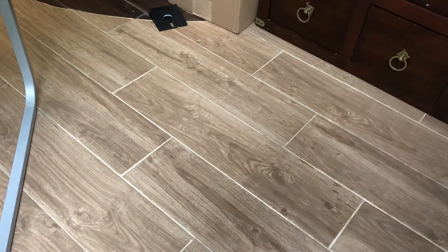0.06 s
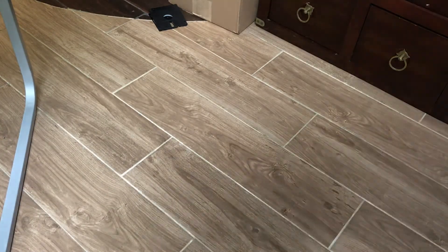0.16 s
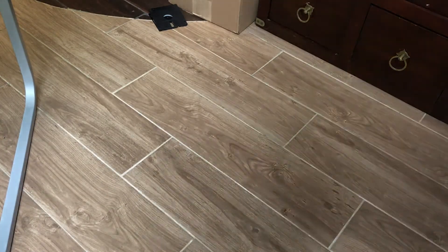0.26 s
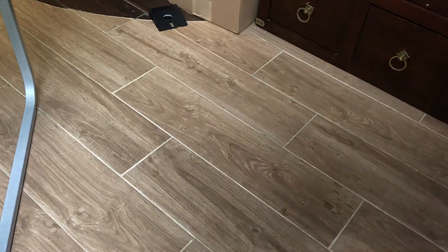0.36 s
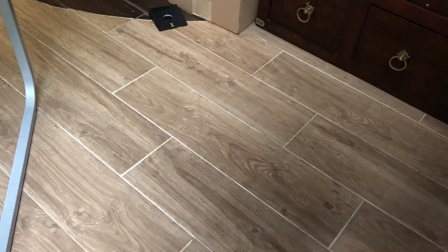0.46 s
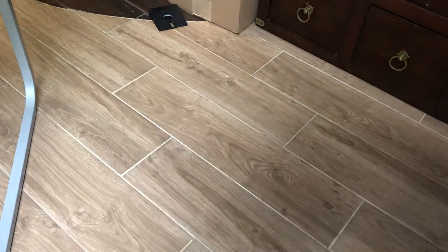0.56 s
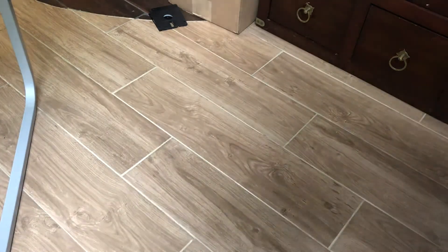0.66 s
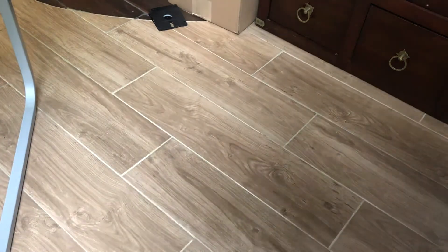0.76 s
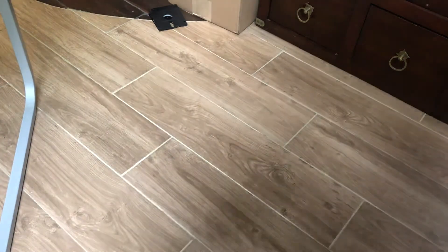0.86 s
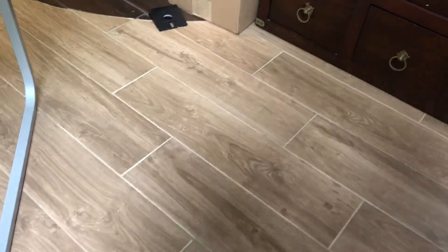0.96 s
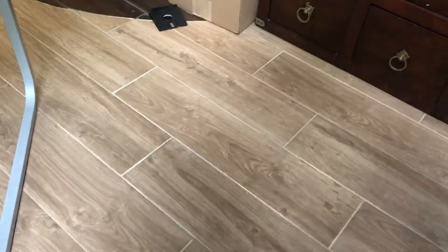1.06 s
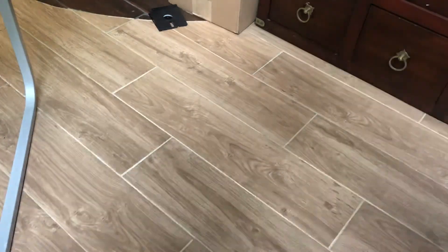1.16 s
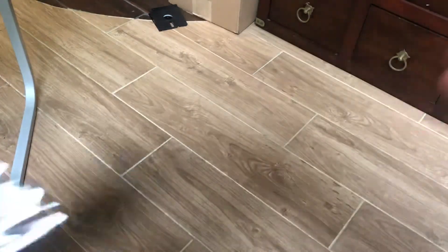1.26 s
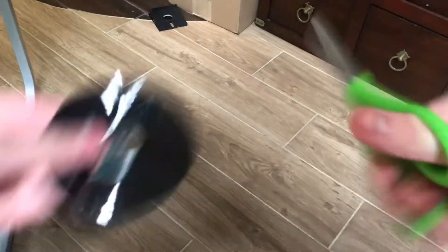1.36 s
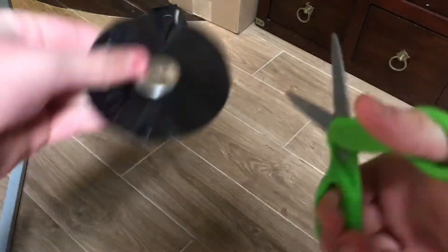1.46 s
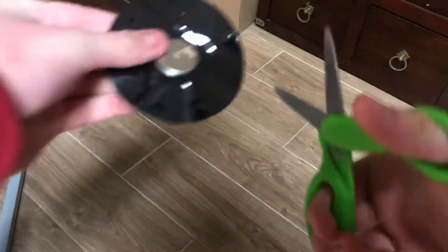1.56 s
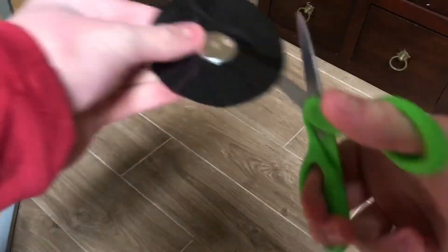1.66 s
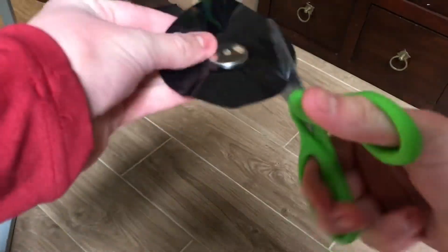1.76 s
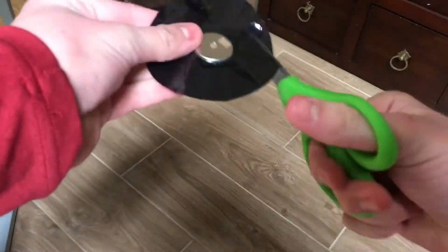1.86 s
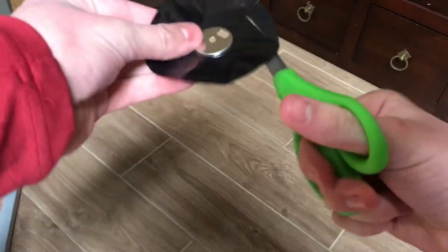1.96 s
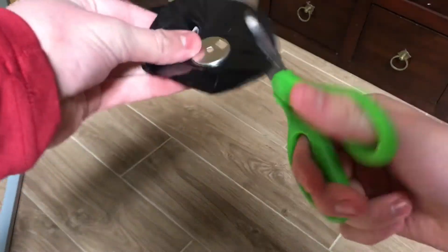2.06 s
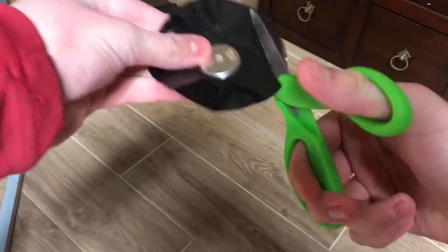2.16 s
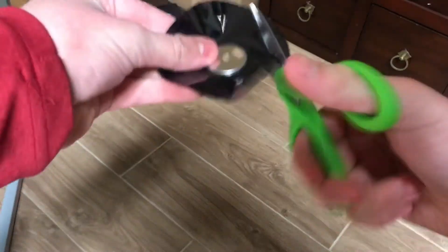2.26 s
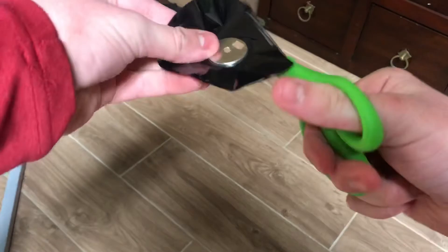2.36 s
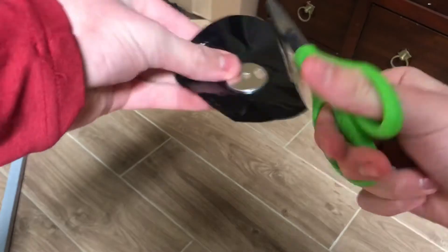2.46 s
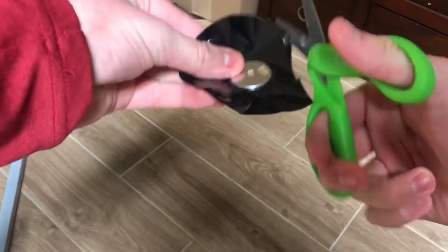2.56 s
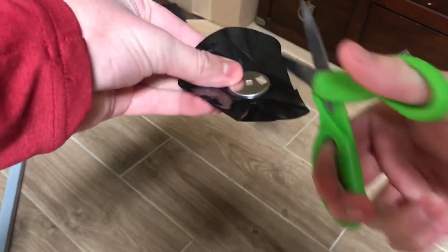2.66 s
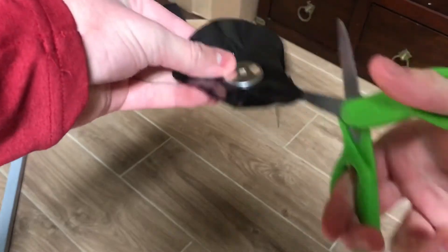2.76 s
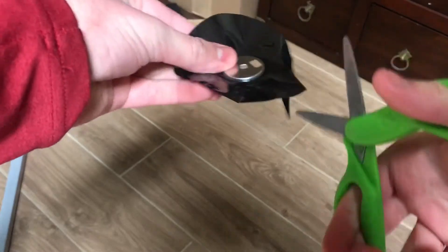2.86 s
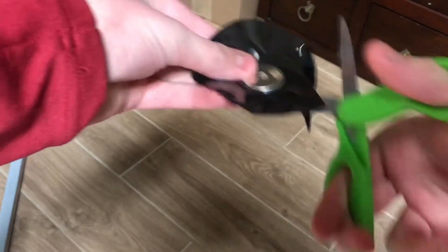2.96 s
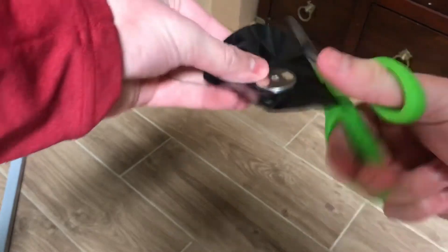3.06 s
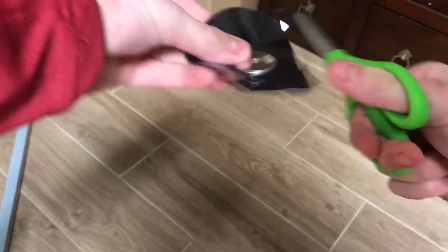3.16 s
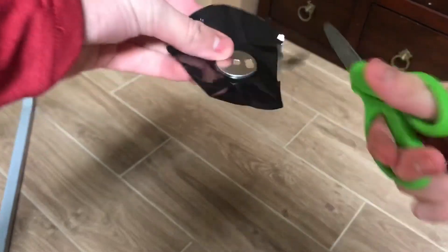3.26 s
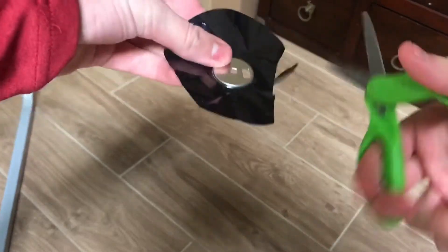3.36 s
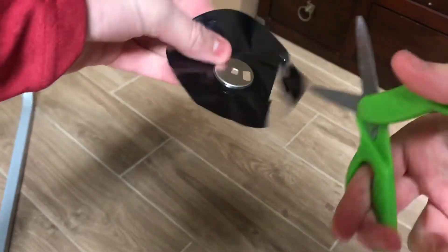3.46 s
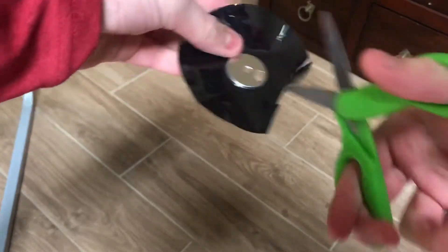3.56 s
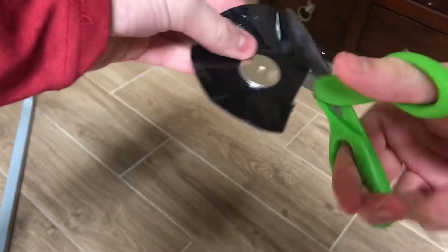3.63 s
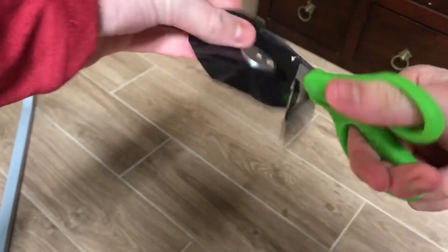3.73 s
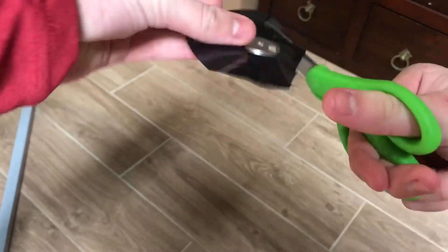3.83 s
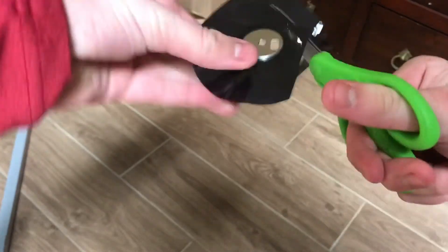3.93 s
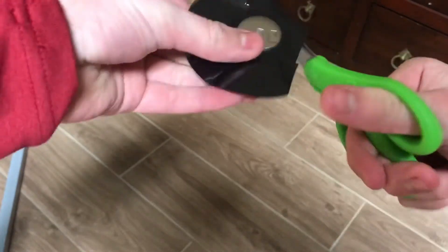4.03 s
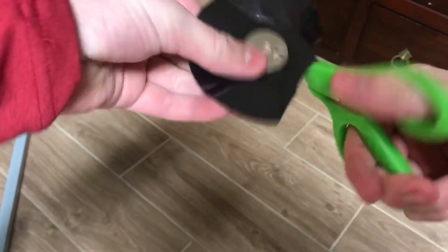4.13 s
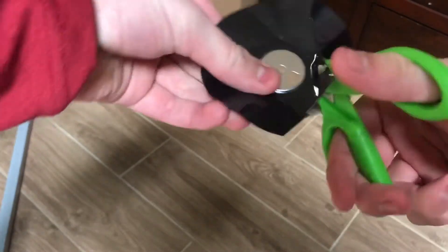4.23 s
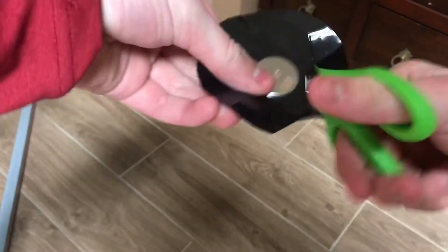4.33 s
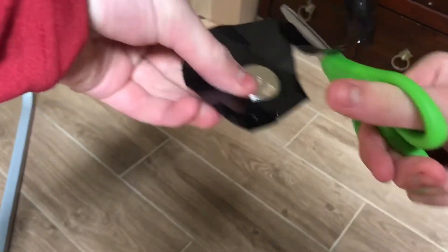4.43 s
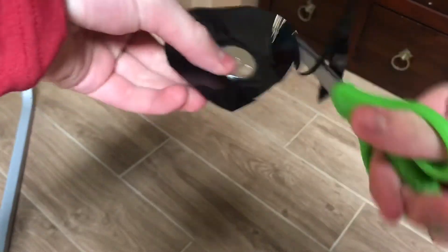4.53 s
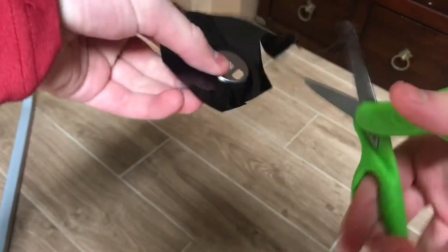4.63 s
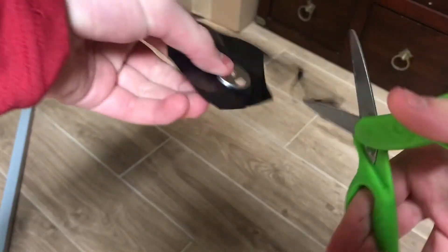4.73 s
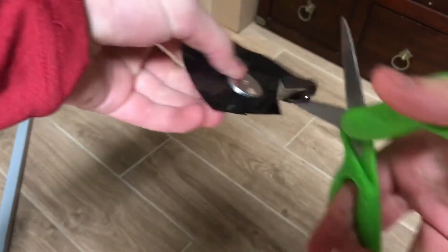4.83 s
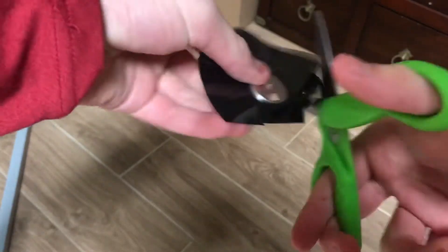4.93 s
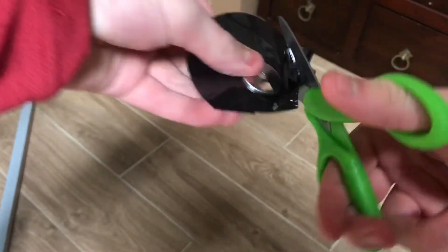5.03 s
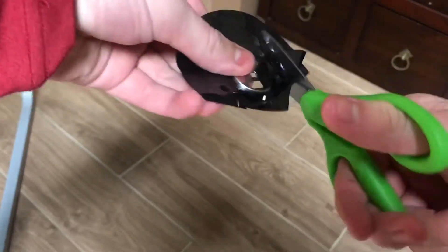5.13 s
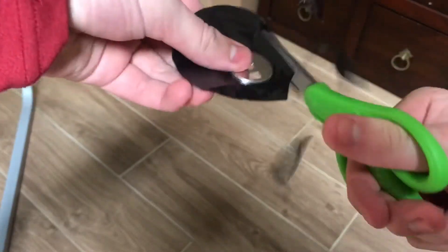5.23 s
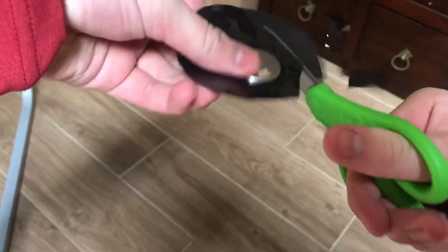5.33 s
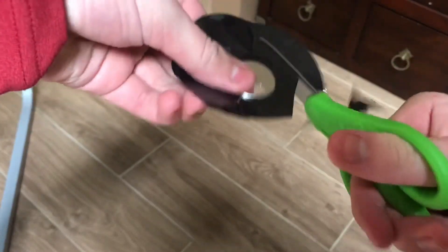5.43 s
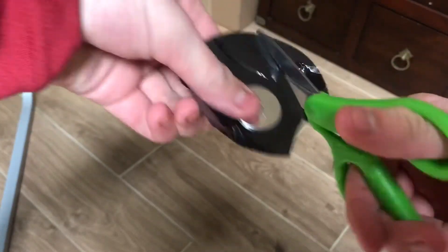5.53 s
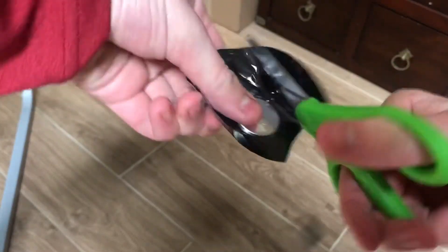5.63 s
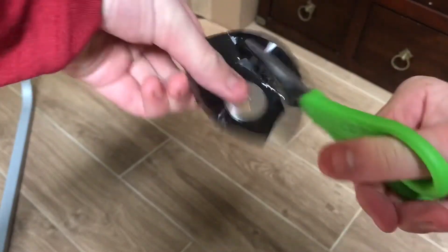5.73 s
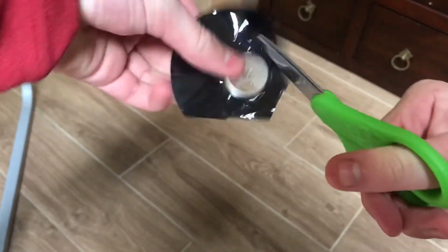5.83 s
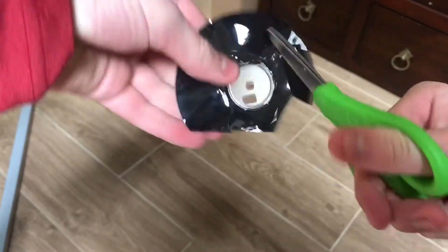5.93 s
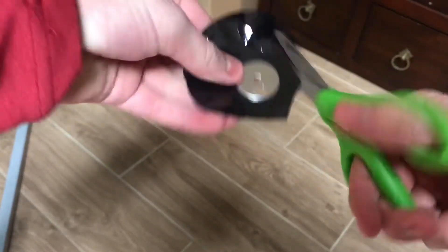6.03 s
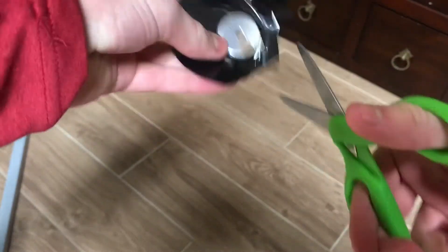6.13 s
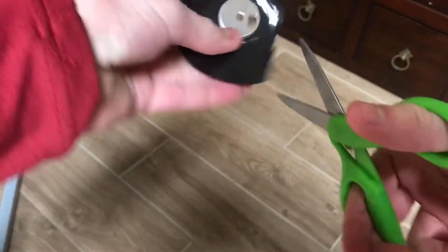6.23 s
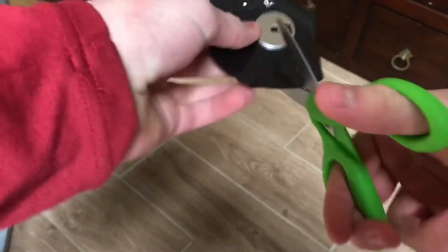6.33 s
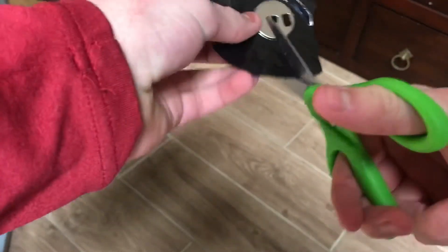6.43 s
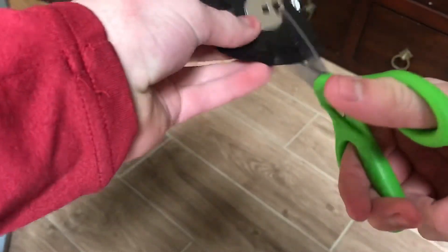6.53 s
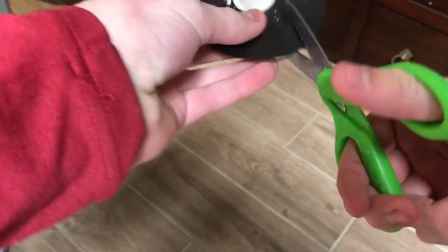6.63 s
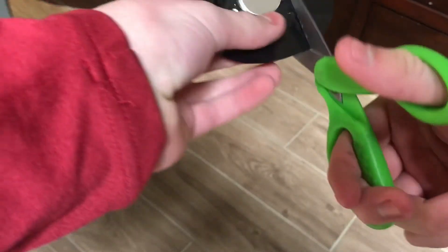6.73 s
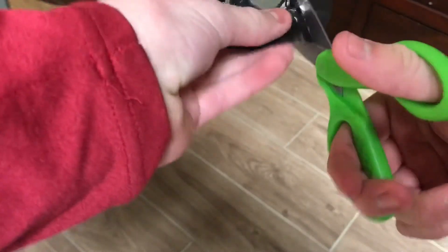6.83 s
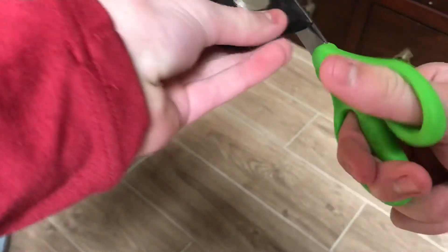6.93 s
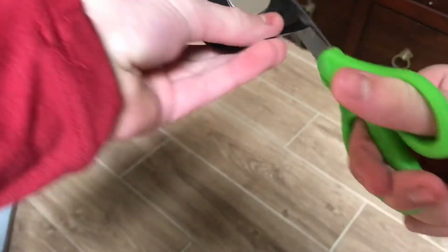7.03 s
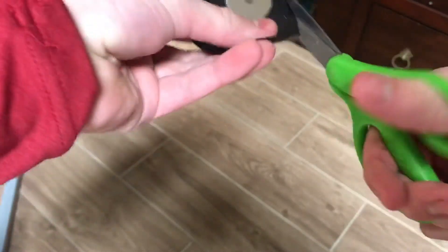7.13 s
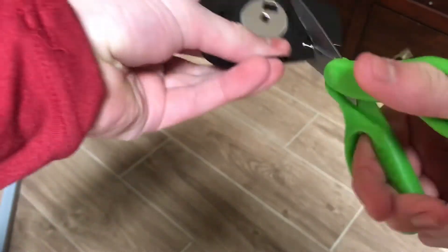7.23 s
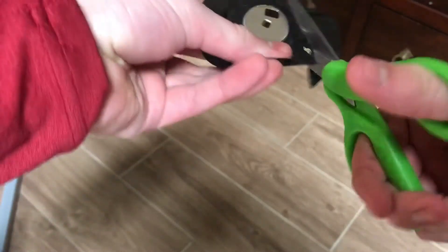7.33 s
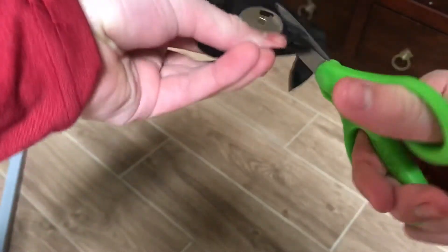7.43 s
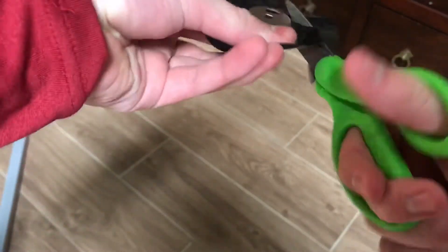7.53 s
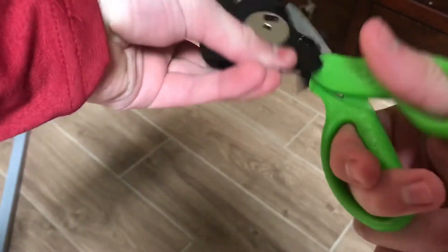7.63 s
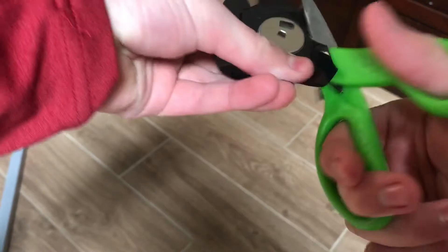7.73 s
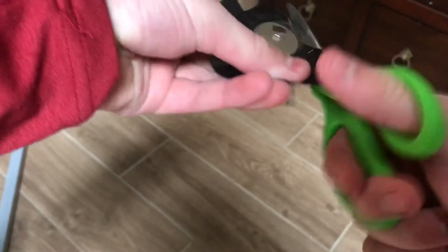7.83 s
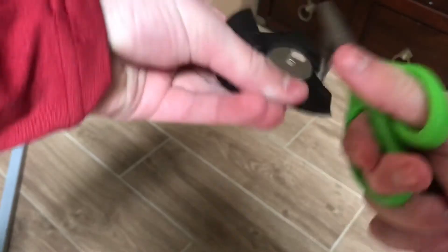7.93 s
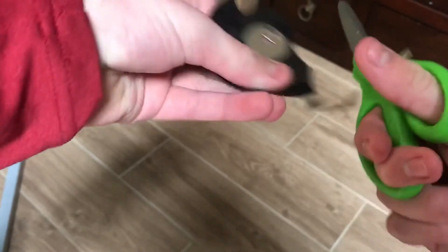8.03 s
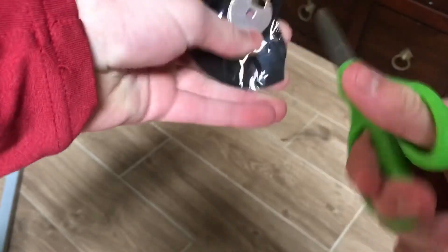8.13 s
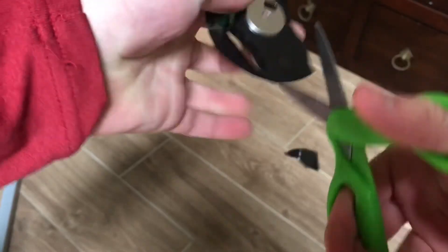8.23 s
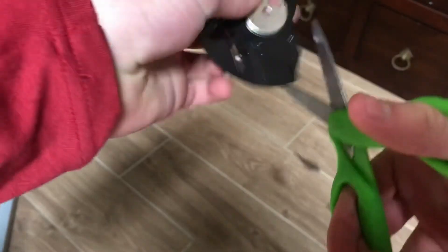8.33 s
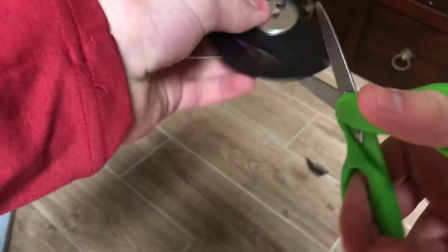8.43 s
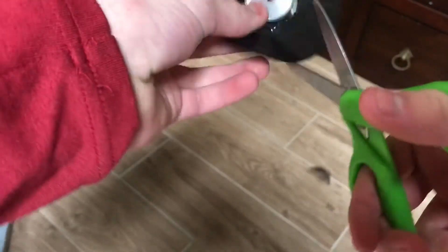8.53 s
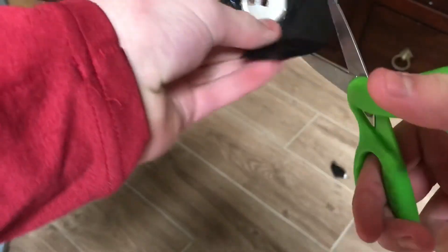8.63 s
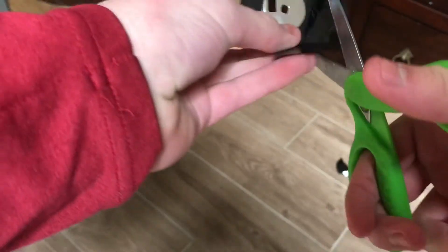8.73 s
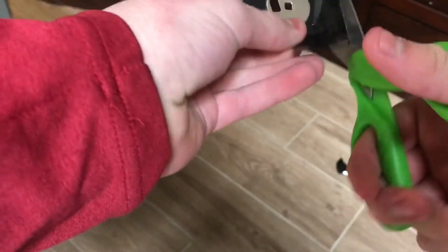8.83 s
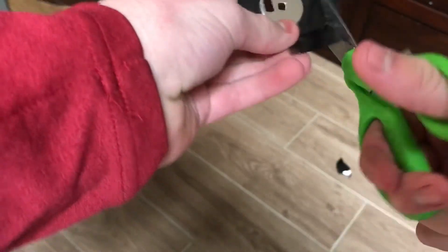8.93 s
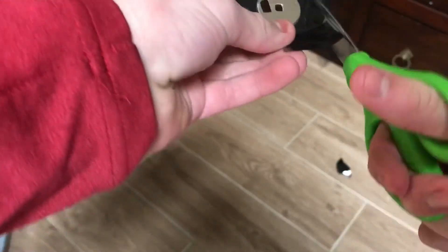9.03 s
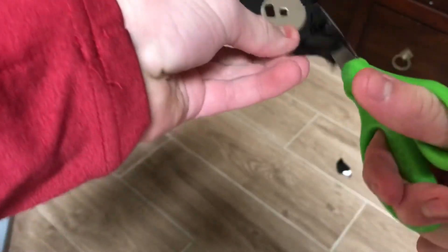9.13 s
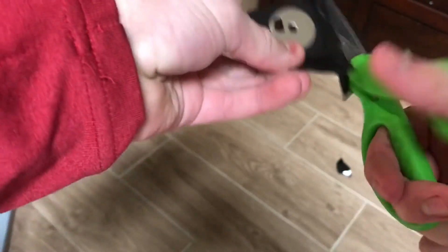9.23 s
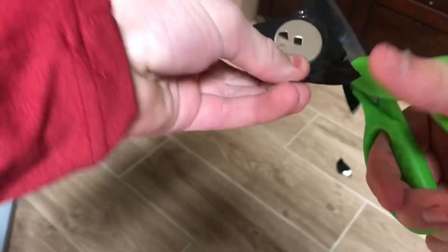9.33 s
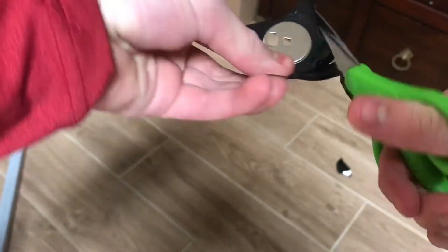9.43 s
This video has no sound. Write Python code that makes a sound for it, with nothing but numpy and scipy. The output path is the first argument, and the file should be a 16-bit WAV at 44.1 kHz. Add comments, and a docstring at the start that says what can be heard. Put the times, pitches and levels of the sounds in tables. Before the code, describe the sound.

After a faint rustle of clothing and a few dull thumps, scissors start trimming a thin plastic disk close to the microphone. Each stroke gives a short dry rasp and a cluster of sharp snaps as the stiff film cracks. Between cuts the plastic slides, crinkles and ticks under the fingers, and the steel blades ring faintly. A quiet hum and a soft low throb lie underneath in the small tiled room.

```python
"""Sharp snaps and dry rasps, close up: scissors trim a thin plastic disk in a small tiled room.
Each stroke of the blades rasps through the stiff film, brighter as the disk gets smaller,
and the film cracks as it buckles. Between strokes it slides and ticks under fingers and blades,
and the steel rings faintly. Clothing rustles at the start. Underneath sit a few dull thumps,
a soft low throb about twice a second and a quiet room hum."""
import sys
import numpy as np
from scipy import signal
from scipy.fft import rfft, irfft
from scipy.io import wavfile
from scipy.ndimage import uniform_filter1d

SR = 44100
rng = np.random.default_rng(int(sys.argv[2]) if len(sys.argv) > 2 else 0)


def to_wav(sig):
    """Store sig (one row per channel, or 1-D mono) as 16-bit WAV at the path in sys.argv[1].

    Samples outside -1..1 are clipped; the rate is SR.
    """
    pcm = np.clip(np.atleast_2d(sig), -1, 1) * 32767
    pcm = np.round(pcm).astype(np.int16)
    wavfile.write(sys.argv[1], SR, pcm.T)  # frames by channels


N = 418068
TIME = np.arange(N) / SR
HELD_FROM_S = 1.2   # the film is held close from here on: ticks and small buckles begin

# Soft rustles, clothing at first, then the sliding film: start_s, end_s, level_db, tilt_db_per_octave
RUSTLES = [(0.538,0.694,-65,0), (.881,1.049,-56,-.5), (1.269,1.544,-58.5,1), (1.653,1.76,-50.5,6),
           (2.113,2.22,-44,-2.5), (2.379,2.591,-59,1), (2.672,2.762,-56.5,-0.5), (2.956,3.065,-45.5,0),
           (3.558,3.729,-48.5,0), (3.865,4.055,-57.5,-2.5), (4.025,4.375,-48.5,-2.5),
           (4.369,4.519,-59,-2.5), (4.585,5.146,-55,0), (5.862,6.095,-63.5,-7), (6.304,6.346,-45,3),
           (6.397,6.504,-60.5,-7.5), (6.53,6.641,-53.5,0.5), (7.124,7.3,-52,-1), (7.341,7.469,-50.5,1.5),
           (7.513,7.599,-50.5,1.5), (8.369,8.553,-52.5,2.5), (8.655,8.728,-46.5,0),
           (8.743,9.068,-47.5,-1.2), (9.336,9.47,-45.5,3)]
# Tone of the rasps, rustles and ticks: frequency_hz, relative_db
RASP_COLOUR = [(80,-7.5), (250,-8.5), (550,-3.5), (830,1.5), (1200,4), (1700,5.5), (2400,4), (3400,4.5),
               (4700,4.5), (6700,2), (10500,3), (15500,-1)]


def cracks():
    """The loud accents: the stiff film cracks and the blades click."""
    # One snap a row: start_s, level_db (of 1 ms with equal energy), length_ms, tilt_db_per_octave, peak_hz
    hits = [(1.2665,-21.5,3.6,-1.5,2530), (1.3661,-18,1.5,-5,2040), (1.4003,-17,1.9,-4,1070),
            (1.5458,-23,1.6,-3.5,6300), (1.6315,-24.5,1.5,-2.5,8500), (1.7507,-19.5,2,-3,1585),
            (1.7605,-16,2.2,-3,1370), (1.7951,-8.5,2.2,0,1410), (1.8067,-14,1.3,-2,1310),
            (1.8279,-7,1.3,-0.5,12300), (1.9781,-25,2.6,-4.5,848), (2.0114,-16,0.59,0.8,4460),
            (2.0695,-7.5,2.1,0.5,10100), (2.0972,-13.5,0.86,-.5,1680), (2.1434,-23,1.6,-1,10000),
            (2.2207,-18,0.38,3.5,11300), (2.2681,-6.5,4.8,0,12100), (2.403,-22,6.7,-3,6720),
            (2.4971,-31.5,4.2,-3,12000), (2.702,-37,1.8,-0.5,1780), (2.8126,-27.5,1.4,0,8600),
            (3.0692,-8.5,4.2,0.95,880), (3.134,-14.5,2.1,.5,12000), (3.1934,-5.5,1.1,4,1330),
            (3.2297,-20,4,-1,1240), (3.3646,-38,2.2,-3,2000), (3.4549,-29.5,4.3,-5,2153),
            (3.4969,-36.5,1.1,-8,3600), (3.6442,-26,1.8,-2.3,5340), (3.7047,-16,4.2,-2.5,1110),
            (3.9753,-32.5,1.2,1.5,2100), (4.0491,-18,1,1.5,1160), (4.1473,-15.5,1,-2.5,6340),
            (4.2151,-24.5,3.7,-2,1200), (4.3445,-27,3.1,1.5,11940), (4.8019,-30.5,0.33,-5,1235),
            (5.07,-26,1.2,-2.5,1860), (5.1852,-12.5,3.4,0,880), (5.2191,-10.5,3.8,-0.7,10500),
            (5.4484,-18,6.1,-.5,1300), (5.4681,-10.5,0.29,0.8,11100), (5.4827,-16.5,2.2,-3.5,3020),
            (5.6123,-22,0.38,-1.5,4150), (5.6302,-11,0.31,0.3,3180), (5.7261,-5,0.39,2.5,885),
            (5.7598,-13.5,2.7,1.5,873), (5.7703,-8.5,2.4,-0.7,12000), (5.8393,-15.5,1.6,.1,4360),
            (5.9597,-13,0.55,6,4420), (5.976,-20.5,.3,2.5,9800), (6.11,-42,1.5,-7.5,1000),
            (6.1523,-37,1.4,-5.5,1300), (6.58,-28,0.86,-5.5,8550), (6.6314,-17,2.6,-2,8280),
            (6.7551,-28.5,3.4,-7,6240), (6.8402,-19.5,2.3,-5.5,2400), (6.8448,-10.5,1.7,1.5,1880),
            (6.87,-10,2,0.5,10900), (6.903,-16.5,0.34,5.5,2800), (6.9055,-10.5,0.47,4,11100),
            (6.9141,-13.5,5.3,0.5,9050), (6.9798,-18.5,0.79,0,3040), (7.051,-22,1.2,-1.5,2720),
            (7.1458,-16,1.3,1.3,3120), (7.2715,-20.5,7.1,-4,5800), (7.4058,-16.5,1.8,3,11700),
            (7.4566,-30.5,4.2,-2.5,12000), (7.6219,-24,1.2,1.5,2940), (7.6588,-19.5,0.94,2,3100),
            (7.779,-29.5,1.6,-2.5,2680), (7.8333,-16,6.7,4,3280), (7.8729,-6.5,2.7,1.3,3200),
            (8.1018,-13.5,.6,-1,7960), (8.3363,-28.5,.9,0.8,6300), (8.3746,-17.5,2.5,-4.5,4340),
            (8.892,-24.5,6.9,0,9350), (8.9673,-18,3.4,-1.5,10600), (9.2019,-16.5,0.44,3,5020),
            (9.323,-17.5,0.55,1,1750), (9.381,-17,1.9,2.5,5170), (9.4733,-16.5,0.67,2.5,3800)]
    return snaps(hits)


def buckles(per_s=9, above_slide_db=16, spread_db=3, length_ms=2.06, tilt_db=-3, low_hz=1200, high_hz=7000):
    """The sliding film buckles in small, uneven snaps, louder the firmer the slide."""
    hits = []
    for start, end, slide_db, _ in RUSTLES:
        if start > HELD_FROM_S:
            for when, force, pitch in rng.random((round((end - start) * per_s), 3)):
                level_db = slide_db + above_slide_db + spread_db * (2 * force - 1)
                peak_hz = low_hz * (high_hz / low_hz) ** pitch
                hits.append((start + (end - start) * when, level_db, length_ms, tilt_db, peak_hz))
    return snaps(hits)


def snaps(hits, bite_db=-23, bite_s=0.0054, bite_rise_db=18, edge_hz=8500, hollow_hz=2130, diffuse=0.19):
    """Each snap has one tonal peak: low ones ring, very high ones only brighten the crack."""
    # Tone of the snapping film: frequency_hz, relative_db
    snap_colour = [(80,-24), (250,-7.5), (420,-8.5), (590,-9), (830,-.5), (1180,2.5), (1660,5.5),
                   (2350,3.5), (3330,8), (4700,6.5), (6660,6.5), (9400,2), (13300,0.5), (16000,2)]
    out = np.zeros(N)
    lead = int(bite_s * SR)
    low, high = (signal.butter(2, edge_hz, side, fs=SR, output="sos") for side in ("low", "high"))
    for start, level_db, length_ms, tilt_db, peak_hz in hits:
        # the peak stands out further near the disk's own hollow pitch
        hollow = np.exp(-(np.log2(peak_hz / hollow_hz) / 0.44) ** 2)
        film = body(snap_colour, tilt_db, peak_hz, lift=6.5 * (1 + hollow))
        strength = from_db(level_db) * np.sqrt(SR / 1000)
        # the film crackles under the growing load just before it gives way
        bite = unit_energy(rng.standard_normal(lead) * from_db(np.linspace(-bite_rise_db, 0, lead)))
        add(out, start - lead / SR, strength * from_db(bite_db) * signal.fftconvolve(bite, film))
        # the top of the crack is over sooner than its body
        crack = signal.sosfilt(low, fracture(length_ms)) + signal.sosfilt(high, fracture(length_ms * 0.38))
        snap = unit_energy(signal.fftconvolve(crack, film))
        add(out, start, strength * snap)
        # the room hears the film from all sides, which evens out its colour
        radiated = np.sqrt(1 - diffuse) * snap
        add(radiated, 0, np.sqrt(diffuse) * film)
        add(out, start, strength * signal.fftconvolve(radiated, room()))
    return out


def fracture(length_ms, rise=0.19, fall=0.81, ragged_db=0.5, size=2048):
    """A brief avalanche of tiny breaks, its energy spread evenly over all pitches."""
    age = np.arange(1, size + 1) / SR * 1000 / length_ms
    envelope = age ** rise * np.exp(-fall * age)
    burst = rfft(rng.standard_normal(size) * envelope * from_db(-ragged_db * drift(size, per_s=2300)))
    # keep the fine ripple of the spectrum, flatten its broad shape
    broad = np.sqrt(uniform_filter1d(np.abs(burst) ** 2, size=90) + 1e-12)
    return irfft(burst / broad)[:size // 2]


def strokes(first_tilt_db=-1.5, brighten_db_per_s=0.5):
    """The blades rasp through the film; each cut leaves a smaller, brighter disk."""
    # Scissor strokes: start_s, end_s, level_db
    cuts = [(1.785,1.86,-31.5), (2.07,2.097,-33), (2.271,2.371,-40.5), (3.07,3.123,-37.5),
            (3.707,3.794,-37.5), (4.128,4.151,-33), (4.501,4.548,-39), (4.904,4.98,-31.5),
            (5.141,5.22,-38.5), (5.216,5.258,-29.5), (5.562,5.773,-42), (5.933,5.968,-40.5),
            (6.847,6.97,-41), (7.62,7.688,-43.5), (7.834,7.876,-39), (9.001,9.02,-25), (9.161,9.263,-40)]
    first_s = cuts[0][0]
    moves = [(start, end, level_db, first_tilt_db + brighten_db_per_s * (start - first_s))
             for start, end, level_db in cuts]
    return rasps(moves, taper=0.24, slips_per_s=160)


def rustles():
    """Soft rustles: clothing at first, then fingers or blades sliding on the film."""
    return rasps(RUSTLES, taper=0.16, slips_per_s=220)


def rasps(moves, taper, slips_per_s, firm_db=-40, swell_db=4.0, size=28000):
    """Four facets of a surface slip at once, each at its own pitch; a light touch mostly hisses."""
    out = np.zeros(N)
    for start, end, level_db, tilt_db in moves:
        count = int(np.clip((end - start) * SR, 256, size))
        force = from_db(swell_db * drift(size, per_s=110.6)[:count]) * signal.windows.tukey(count, taper)
        hiss = 0.25 * from_db((firm_db - level_db) / 2)
        facets_hz = np.geomspace(1200, 8000, num=4) * 2 ** rng.uniform(-1.13, 0.9, size=4)
        scrape = 0
        for peak_hz in facets_hz:
            friction = force * stick_slip(size, hiss, slips_per_s)[:count]
            scrape += signal.fftconvolve(friction, body(RASP_COLOUR, tilt_db, peak_hz, lift=9))
        scrape = from_db(level_db) * np.sqrt(count) * unit_energy(scrape)
        add(out, start, scrape)
        add(out, start, signal.fftconvolve(scrape, room()))
    return out


def stick_slip(count, hiss, slips_per_s, spread_db=5.0, slip_s=0.0011):
    """The surface catches and lets go: uneven grains of friction over a smooth sliding hiss."""
    slips = impulses(count, slips_per_s, spread_db, cap=4)
    grains = signal.lfilter([1], [1, -np.exp(-1 / (slip_s * SR))], slips)
    return (rms_one(grains) + hiss) * rng.standard_normal(count)


def crinkle(ticks_per_s=50, spread_db=8.0, level_db=-65):
    """The film gives faint stray ticks for as long as the fingers hold it."""
    ticks = (TIME > HELD_FROM_S) * impulses(N, ticks_per_s, spread_db, cap=3.5)
    tick = signal.fftconvolve(fracture(length_ms=3.8), body(RASP_COLOUR))
    return from_db(level_db) * rms_one(signal.fftconvolve(ticks, tick)[:N])


def blades(cutting):
    """The cutting forces set the steel ringing."""
    # Modes of the steel blades: pitch_hz, gain_db, t60_s
    modes = [(1346,-65.5,0.54), (1785,-66,.28), (2090,-62,.3), (2870,-68,.25), (3200,-59.5,0.085),
             (4540,-64,.3)]
    t = TIME[:SR // 2]
    ring = sum(from_db(db - 60 * t / t60) * np.sin(2 * np.pi * hz * t) for hz, db, t60 in modes)
    return signal.fftconvolve(cutting, ring)[:N]


def thumps():
    """Dull low thumps: steps or kneeling at first, then the recoil of hard snaps."""
    # Low thumps: centre_s, level_db, half_length_s, top_hz
    bumps = [(.624,-43.5,0.03,180), (.893,-35.5,0.0071,302), (.935,-44.5,0.023,236),
             (2.279,-44.5,0.0086,256), (5.776,-39,0.0077,432)]
    return rumbles(bumps, low_hz=50)


def throb(first_s=1.465, period_s=0.4815, count=17, half_length_s=0.047, top_hz=68.5):
    """A soft, regular low beat, perhaps the pulse of whoever holds the microphone."""
    # Level curve of the throb: time_s, level_db
    curve = [(1.4,-58), (2.9,-62), (3.4,-50.5), (4.8,-50.5), (5.3,-55.5), (7.2,-56.5), (7.7,-53), (8.2,-60),
             (8.7,-43), (9.2,-53)]
    beats = [(s, np.interp(s, *np.transpose(curve)), half_length_s, top_hz)
             for s in first_s + period_s * np.arange(count)]
    return rumbles(beats, low_hz=33)


def rumbles(swells, low_hz):
    """Bell-shaped swells of low noise."""
    out = np.zeros(N)
    for centre_s, level_db, half_length_s, top_hz in swells:
        band = signal.butter(4, [low_hz, top_hz], "band", fs=SR, output="sos")
        swell = np.exp(-((TIME[:SR] - .5) / half_length_s) ** 2 / 2)
        rumble = signal.sosfilt(band, rng.standard_normal(SR)) * swell
        add(out, centre_s - .5, from_db(level_db) * unit_energy(rumble) * np.sqrt(np.sum(swell ** 2)))
    return out


def room(near_db=-13, near_t60=0.04, near_delay_s=0.0022, tail_db=-16.5, tail_t60=0.4, tail_delay_s=0.0085):
    """Quick scatter off the hands, then a short tiled tail; new for each sound, as the hands move."""
    # Tone of the reflections: frequency_hz, relative_db
    room_colour = [(100,-1.5), (1400,1.5), (3000,-0.5), (15000,-10)]
    t = TIME[:SR // 4]
    near = unit_energy(rng.standard_normal(len(t)) * from_db(-60 * t / near_t60) * (t > near_delay_s))
    tail = unit_energy(rng.standard_normal(len(t)) * from_db(-60 * t / tail_t60) * (t > tail_delay_s))
    return signal.fftconvolve(from_db(near_db) * near + from_db(tail_db) * tail, body(room_colour))


def hum(level_db=-60):
    """Room tone: a steady bed of dark noise."""
    # Tone of the room's hum: frequency_hz, relative_db
    hum_colour = [(20,-35.5), (45,-1), (70,-5), (150,-9.5), (215,-1.5), (330,-10.5), (520,-18),
                  (2300,-24.5), (4000,-27.5), (7500,-32), (15000,-31.5)]
    bed = signal.fftconvolve(rng.standard_normal(N), body(hum_colour, size=8192))[:N]
    return from_db(level_db) * rms_one(bed)


def body(colour, tilt_db=0, peak_hz=1000, lift=0, size=1024):
    """Impulse response of a colour, tilted per octave above 600 Hz and lifted by one tonal peak."""
    octave = np.log2(np.maximum(np.fft.rfftfreq(size, 1 / SR), 1))
    hz, db = np.transpose(colour)
    db = np.interp(octave, np.log2(hz), db) + tilt_db * np.maximum(octave - np.log2(600), 0)
    octaves_away = octave - np.log2(peak_hz)
    hump = 0.8 * np.exp(-(octaves_away / 0.6) ** 2)
    crest = 0.4 * np.exp(-(octaves_away / 0.11) ** 2)
    cepstrum = irfft(np.log(from_db(db + lift * (hump + crest))))
    cepstrum[1:size // 2] *= 2   # minimum phase: nothing sounds before the blow
    cepstrum[size // 2 + 1:] = 0
    return unit_energy(irfft(np.exp(rfft(cepstrum))))


def impulses(count, per_s, spread_db, cap):
    """Randomly timed spikes, mostly small, lifted by at most cap times spread_db."""
    fires = rng.random(count) < per_s / SR
    return fires * from_db(spread_db * np.minimum(rng.exponential(1, count), cap))


def drift(count, per_s):
    """A random wobble with a spread near 1."""
    steps = np.arange(count) * per_s / SR
    return np.interp(steps, np.arange(count), rng.standard_normal(count))


def from_db(db):
    return 10 ** (np.asarray(db) / 20)


def rms_one(x):
    return x / np.sqrt(np.mean(x ** 2) + 1e-20)


def unit_energy(x):
    return x / np.sqrt(np.sum(x ** 2) + 1e-20)


def add(out, start_s, sound):
    """Mix a sound in from start_s."""
    at = int(np.clip(start_s * SR, 0, N - 1))
    out[at:at + len(sound)] += sound[:N - at]


def scene():
    """Close cutting and ringing steel over a low bed of hum, thumps and throb, in mono."""
    background = hum() + thumps() + throb()
    cutting = crinkle() + strokes() + rustles() + cracks() + buckles()
    return (cutting + blades(cutting) + background)[None, :]


def record(dry):
    """The microphone has a narrow treble dip; peaks stop at full scale and the top is cut at 16 kHz."""
    dip_band = signal.lfilter(*signal.iirpeak(10700, Q=12.6, fs=SR), dry)
    limited = np.clip(dry - 0.38 * dip_band, -1, 1)
    return signal.sosfilt(signal.ellip(10, .1, 80, 16000, fs=SR, output="sos"), limited)


dry = scene()
out = record(dry)
to_wav(out)
```